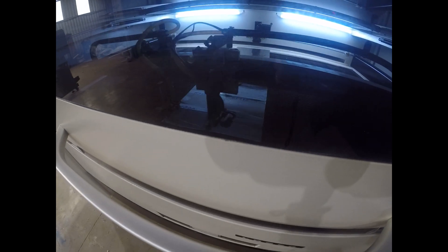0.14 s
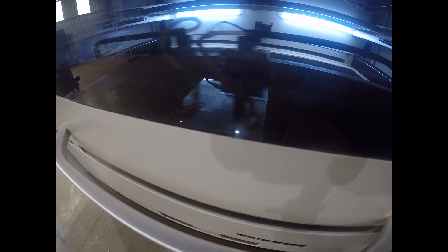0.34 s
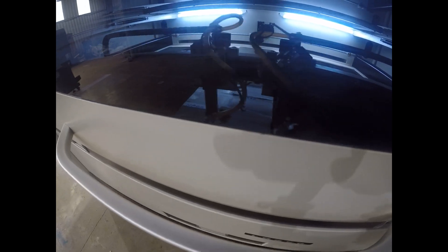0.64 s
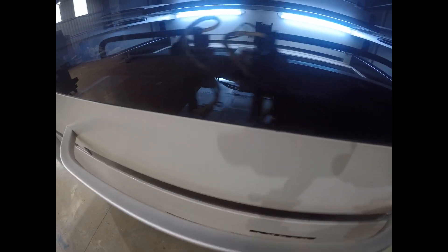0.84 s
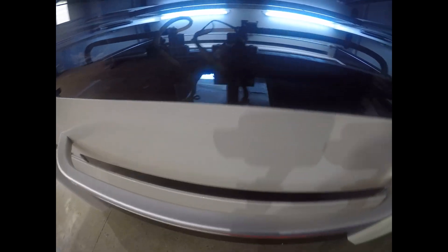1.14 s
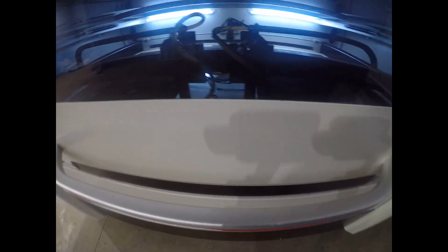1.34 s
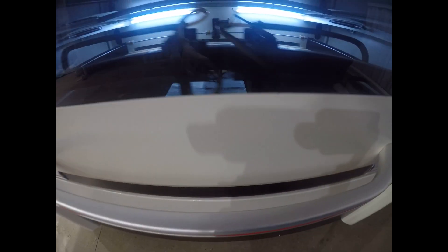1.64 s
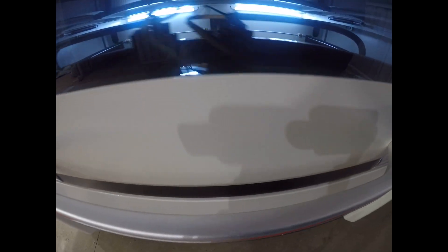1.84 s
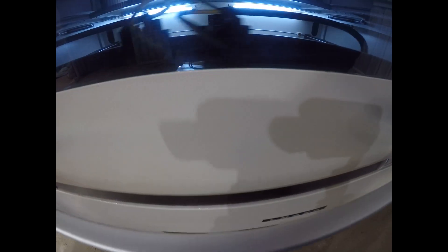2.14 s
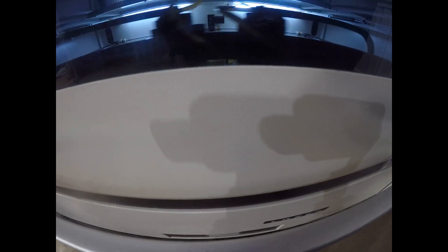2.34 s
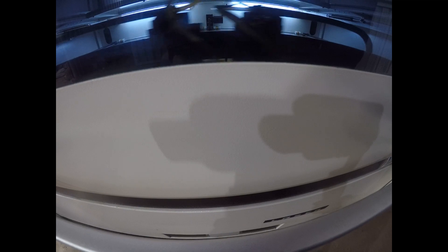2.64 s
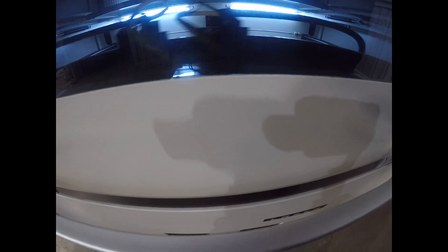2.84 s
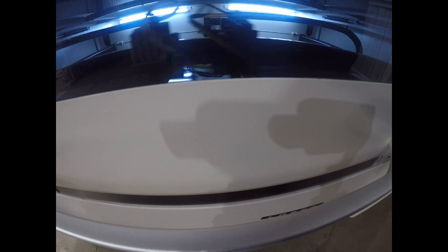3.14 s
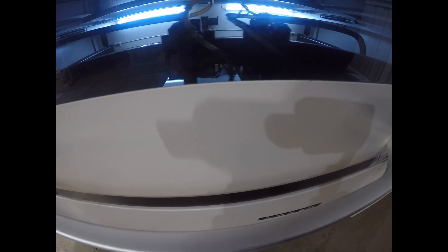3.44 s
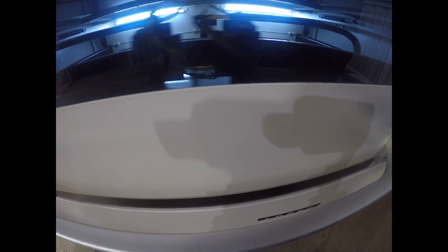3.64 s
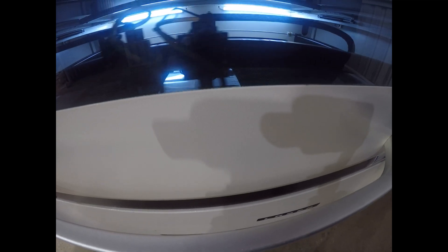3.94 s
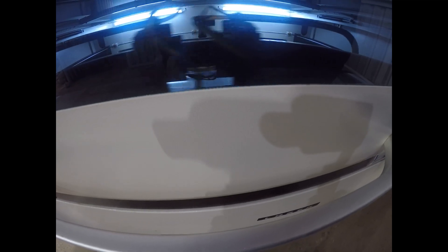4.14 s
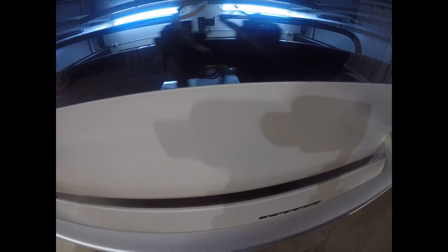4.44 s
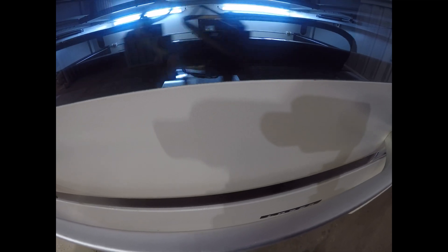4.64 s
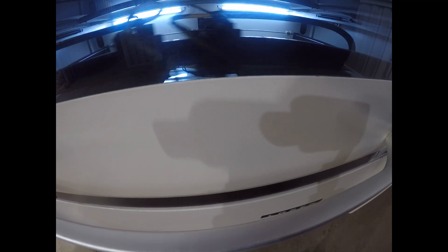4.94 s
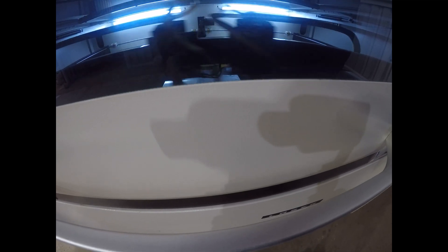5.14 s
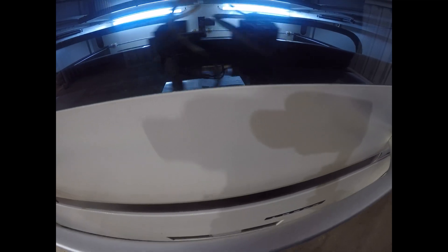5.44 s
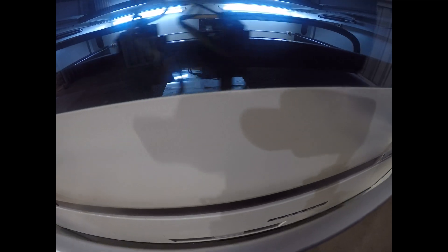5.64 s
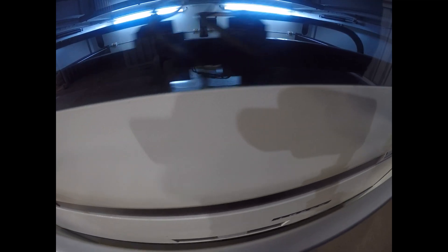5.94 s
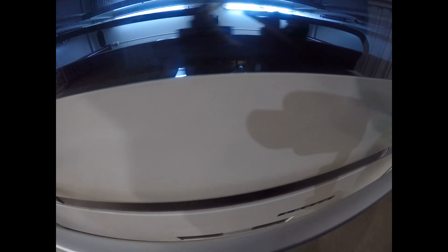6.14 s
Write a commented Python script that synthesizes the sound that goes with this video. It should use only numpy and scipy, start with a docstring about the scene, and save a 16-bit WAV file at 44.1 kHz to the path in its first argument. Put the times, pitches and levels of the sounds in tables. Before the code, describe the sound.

A closed laser engraver runs throughout, about six seconds, heard from just in front of its lid in a workshop. The main sound is a steady low drone from the air pump, mixed with the rumble of the exhaust fan, a fine buzz and a faint hiss of air. Over this, the head carriage swishes softly through the same group of short moves about once a second, with slight chatter and a very faint whine. Light belt ticks come roughly every half second to second, from 0.8 to 5 seconds. At about 1.2 seconds a shoe gives one gritty scuff on the floor, with a little room echo and a faint squeak after it. The motor hum swells briefly around 4.4 seconds, and the hiss around 5.3. Two light, hollow knocks follow at about 5.85 and 6 seconds. The machine grows very slightly louder overall.

```python
"""A closed laser engraver at work in a workshop, heard from just in front of its lid.
Its mains-driven air pump drones and buzzes, the exhaust fan rumbles and air hisses from the nozzle.
The head carriage swishes through the same moves about once a second, with belt ticks and a faint whine.
A shoe scuffs the floor once; two light knocks come near the end."""
import sys
import numpy as np
from scipy import signal
from scipy.fft import rfft, irfft
from scipy.io import wavfile

SR = 44100
rng = np.random.default_rng(int(sys.argv[2]) if len(sys.argv) > 2 else 0)


def inscribe(sig):
    """Save sig as 16-bit PCM at rate SR to the path in sys.argv[1].

    A 1-D sig is mono; a 2-D sig holds one channel per row.
    Samples are clipped to [-1, 1] before scaling.
    """
    pcm = np.round(np.clip(np.atleast_2d(sig).T, -1, 1) * 32767)
    wavfile.write(sys.argv[1], SR, pcm.astype(np.int16))


N = 278182
TIME = np.arange(N) / SR


def undb(db):
    """Decibels to gain."""
    return 10 ** (np.asarray(db) / 20)


def unit(x):
    """Scale to rms 1."""
    return x / np.sqrt(np.mean(x ** 2))


def noise():
    """White noise."""
    return rng.standard_normal(N)


def walk(rate_hz):
    """Smooth random drift, about rate_hz new values a second; rms 1."""
    freq_hz = np.fft.rfftfreq(N, 1 / SR)
    return unit(irfft(rfft(noise()) / (1 + (freq_hz / rate_hz * 2) ** 4), N))


def colour(x, spectrum):
    """Filter by (freq_hz, gain_db) points, steep skirts beyond the ends; rms 1."""
    points_hz, gain_db = np.transpose(spectrum)
    freq_hz = np.fft.rfftfreq(N, 1 / SR) + 1
    gain = undb(np.interp(np.log(freq_hz), np.log(points_hz), gain_db))
    skirts = np.minimum(freq_hz / points_hz[0], 1) ** 4 * np.minimum(points_hz[-1] / freq_hz, 1) ** 4
    return unit(irfft(rfft(x) * gain * skirts, N))


def band(x, centre_hz, width_hz):
    """One resonance; rms 1."""
    return unit(signal.lfilter(*signal.iirpeak(centre_hz, centre_hz / width_hz, fs=SR), x))


def tone(pitch_hz, phase_turns=0):
    """Sine following a pitch curve; rms 1."""
    return np.sqrt(2) * np.sin(2 * np.pi * (np.cumsum(pitch_hz) / SR + phase_turns))


def grains(rate_hz, spread_db):
    """Dense tiny impacts of unequal size; rms 1."""
    impacts = (rng.random(N) < rate_hz / SR) * noise()
    return unit(impacts * undb(spread_db * np.minimum(rng.exponential(size=N), 4)))


def blows(start_s, level_db, t60_s):
    """Envelope of sudden, decaying blows."""
    age_s = TIME - np.asarray(start_s)[:, None]
    return undb(level_db) @ ((age_s >= 0) * np.exp(-np.log(1000) * np.abs(age_s) / t60_s))


def stroke(start_s, length_s, attack_s, t60_s):
    """Envelope of a movement: rise, hold, decay."""
    age_s = TIME - start_s
    decay = np.exp(-np.log(1000) * np.maximum(age_s - length_s, 0) / t60_s)
    return np.clip(age_s / attack_s, 0, 1) * decay


def swell(middle_s, length_s, level_db):
    """Round-topped envelope."""
    return undb(level_db) / (1 + (2 * (TIME - middle_s) / length_s) ** 4)


def room(x, t60_s, wet_db):
    """Add the workshop's diffuse tail."""
    tail = noise() * np.exp(-np.log(1000) * TIME / t60_s) * (1 - np.exp(-TIME / 0.012))
    return x + undb(wet_db) * signal.fftconvolve(x, tail / np.linalg.norm(tail))[:N]


# pump drone: mains_multiple, level_db
PUMP_HARMONICS = [(1, -31), (2, -36.5), (3, -31), (4, -55.5), (5, -60)]
# valve buzz through the casing: freq_hz, gain_db
VALVE_SPECTRUM = [(1200, -11), (2500, -7.5), (3600, 2.5), (4600, -6), (5400, 0.5), (6000, 4.5), (6700, 3),
                  (7400, 2.5)]


def pump(mains_hz, waver_db, buzz_db):
    """Harmonics dip in phase on each suction stroke; two valves tick in turn and ring the casing."""
    turns = mains_hz * TIME + 0.0038 * walk(2.2)
    drone = 0
    for multiple, level_db in PUMP_HARMONICS:
        peak = np.sqrt(2) * undb(level_db + waver_db * walk(1.0))
        drone -= peak * np.cos(2 * np.pi * round(multiple) * turns)
    valves = 0
    # two ticks a cycle favour even harmonics; the casing scatters size and phase
    for multiple in range(20, 125):
        size = rng.uniform(0.4, 1) * (0.6 if multiple % 2 else 1)
        valves += size * np.cos(2 * np.pi * (multiple * mains_hz * TIME + rng.random()))
    return drone + undb(buzz_db) * colour(valves, VALVE_SPECTRUM)


# shaft and blade tones: pitch_hz, level_db, wander_hz
FAN_TONES = [(55.13, -37, 0.2), (75.14, -41, 0.12), (96.7, -45, 0.32), (161.7, -46.5, 0.52),
             (188.9, -44.5, 0.31), (343, -68, 0.47), (419.3, -62.5, 0.504), (442, -74, 0.25),
             (479.2, -69.5, 1.473), (754, -75.5, 3.88), (1000, -72, 0.42), (1623, -75, 0.915),
             (2266, -73.5, 2), (3860, -73, 3.05)]
# motor hum, one swell: time_s, level_db
HUM_LEVELS = [(0, -55.5), (1.05, -54), (1.4, -48.5), (3.95, -48), (4.4, -38), (4.9, -50.5), (6.3, -47)]
# exhaust fan and duct: freq_hz, gain_db
RUMBLE_SPECTRUM = [(8, 4.5), (26, -1), (43, -4.5), (60, 1), (85, 2.5), (110, -4.5), (140, -7.5),
                   (170, -0.5), (200, -8.5), (260, -13), (320, -16.5), (400, -20.5), (490, -30.5),
                   (570, -47.5)]


def fans(hum_hz, flutter_db):
    """Shaft and blade tones wander over turbulent duct rumble; a motor hums beside them."""
    tones = 0
    for pitch_hz, level_db, wander_hz in FAN_TONES:
        gain = undb(level_db + 2.86 * walk(2.5))
        tones += gain * tone(pitch_hz + wander_hz * walk(2.98), phase_turns=rng.random())
    time_s, hum_db = np.transpose(HUM_LEVELS)
    hum = undb(np.interp(TIME, time_s, hum_db)) * tone(hum_hz + 0.31 * walk(2.7))
    rumble = undb(-33 + flutter_db * walk(17)) * colour(noise(), RUMBLE_SPECTRUM)
    return tones + hum + rumble


# cabinet airflow: freq_hz, gain_db
CABINET_SPECTRUM = [(480, -29), (570, -12.5), (660, -1.5), (760, 1.5), (950, -2.5), (1040, -9),
                    (1160, -11.5), (1290, -1.5), (1650, -1), (1880, -5.5), (2300, -5), (3150, -11.5),
                    (3600, -12.5), (5000, -20.5)]
# nozzle hiss: freq_hz, gain_db
NOZZLE_SPECTRUM = [(2500, -5.5), (4500, -5), (6700, -0.5), (8200, -1.5), (9200, -1), (9750, 5),
                   (10300, -7.5), (11400, -7.5), (11700, -15), (12500, -13.5), (13150, -12), (13600, -18),
                   (14300, -15), (15000, -31)]
# broader hiss: freq_hz, gain_db
SURGE_SPECTRUM = [(1400, -4.5), (2050, -14), (2700, -1.5), (3400, -8), (4500, -1), (5500, -0.5),
                  (6900, -0.5), (9000, -5.5), (12000, -19)]
# its swells: middle_s, length_s, level_db
SURGE_SWELLS = [(2.05, 0.4, -57.5), (2.823, 0.3, -54), (5.265, 0.32, -48)]


def air(flutter_db):
    """Air rushes through the cabinet and hisses from the nozzle; a broader hiss swells at times."""
    cabinet = undb(-54.5 + flutter_db * walk(4.7)) * colour(noise(), CABINET_SPECTRUM)
    nozzle = undb(-53 + flutter_db * walk(28)) * colour(noise(), NOZZLE_SPECTRUM)
    surge = sum(swell(*row) for row in SURGE_SWELLS) * colour(noise(), SURGE_SPECTRUM)
    return cabinet + nozzle + surge


# head moves within one cycle: start_s, length_s, level_db
HEAD_MOVES = [(0.252, 0.082, -48), (0.36, 0.067, -50), (0.416, 0.066, -44), (0.717, 0.057, -46),
              (0.77, 0.032, -45), (0.86, 0.018, -49), (0.9, 0.03, -50), (0.954, 0.02, -49.5)]
# belt and bearings: freq_hz, gain_db
BELT_SPECTRUM = [(1400, -14), (2400, -12), (3250, -14), (3580, 0.5), (4400, -11.5), (5300, -3.5), (6600, 0),
                 (7700, 3), (8300, -2.5), (9600, -2.5), (10600, -14), (14000, -26)]
# loose parts: centre_hz, width_hz, gain_db
CHATTER_BANDS = [(3565, 130, -22), (3980, 250, -23.5), (6730, 350, -11.5), (7380, 350, -15),
                 (7780, 350, -19)]


def carriage(cycle_s, swish_db, uneven_db, chatter_db):
    """Belt and bearings swish on each move; every loose part chatters in fits of its own."""
    power = sum((undb(level_db) * stroke(cycle_start_s + start_s, length_s, attack_s=0.01, t60_s=0.34)) ** 2
                for cycle_start_s in np.arange(-cycle_s, TIME[-1], cycle_s)
                for start_s, length_s, level_db in HEAD_MOVES)
    travel = np.sqrt(power) * undb(uneven_db * walk(47))
    swish = undb(swish_db) * colour(grains(rate_hz=7000, spread_db=-0.5), BELT_SPECTRUM)
    chatter = 0
    for centre_hz, width_hz, gain_db in CHATTER_BANDS:
        fits = undb(chatter_db * walk(29))
        chatter += undb(gain_db) * unit(fits * band(noise(), centre_hz, width_hz))
    return travel * (swish + chatter)


# belt ticks: start_s, click_db, ring_db
BELT_TICKS = [(0.797, -54, -51), (0.967, -46, -51), (1.197, -51, -52), (1.712, -44.5, -49.5),
              (2.248, -44, -65), (3.068, -46, -50), (3.588, -45, -53), (4.104, -45, -54), (4.606, -45, -55),
              (5.042, -45, -60)]


def belt_ticks(ring_hz):
    """The belt ticks: a sharp click and a narrow ring."""
    start_s, click_db, ring_db = np.transpose(BELT_TICKS)
    click = blows(start_s, click_db, t60_s=0.054) * colour(noise(), BELT_SPECTRUM)
    ring = blows(start_s, ring_db, t60_s=0.11) * band(noise(), ring_hz, width_hz=90)
    return click + ring


# drive whine: middle_s, length_s, level_db
WHINE_SWELLS = [(0.92, 0.093, -66), (1.81, 0.32, -64.5), (3.7, 0.21, -70)]


def drive_whine(pitch_hz, idle_db):
    """The drive motor whines faintly, louder on some moves."""
    effort = undb(idle_db) + sum(swell(*row) for row in WHINE_SWELLS)
    return effort * tone(pitch_hz + 3 * walk(18.7))


# grit under the sole: freq_hz, gain_db
GRIT_SPECTRUM = [(1200, -6.5), (2300, -8), (2900, 0), (3800, -1), (5000, -3), (6900, -3), (8500, -11),
                 (10500, -23), (14500, -37)]
# sole edge: freq_hz, gain_db
RASP_SPECTRUM = [(900, 0), (1150, -15), (1450, 5.5), (1900, -0.5), (2300, 9), (2900, -21)]
# hollow thud of sole and knocks: freq_hz, gain_db
THUD_SPECTRUM = [(220, 11), (400, -6), (560, -11.5), (780, 1), (950, -5), (1200, -34), (2500, -30)]


def scuff(start_s, sole_lag_s, squeak_s):
    """A sole's edge rasps, drags over grit and settles with a duller rub; a faint squeak follows."""
    drag = undb(-35.5) * stroke(start_s, length_s=0.084, attack_s=0.012, t60_s=0.17)
    grit = drag * colour(grains(rate_hz=16000, spread_db=1), GRIT_SPECTRUM)
    edge = undb(-40) * stroke(start_s, length_s=0.045, attack_s=0.0044, t60_s=0.25)
    rasp = edge * colour(grains(rate_hz=4400, spread_db=4.5), RASP_SPECTRUM)
    landing = undb(-38) * stroke(start_s + sole_lag_s, length_s=0.022, attack_s=0.014, t60_s=0.05)
    rub = landing * colour(noise(), THUD_SPECTRUM)
    narrow_noise = band(band(noise(), 1620, 170), 1620, 170)
    squeak = swell(squeak_s, length_s=0.12, level_db=-57.5) * narrow_noise
    return room(grit + rasp + rub, t60_s=1.15, wet_db=-7.5) + squeak


# contacts, the first three heard as one knock: start_s, click_db, thud_db
KNOCK_CONTACTS = [(5.849, -48, -37.5), (5.855, -42.5, -44), (5.869, -40.5, -45), (5.998, -39, -51)]
# contact click: freq_hz, gain_db
CLICK_SPECTRUM = [(1200, -14), (3000, -8), (3900, -1.5), (5200, -5), (6600, -1), (8500, -10), (14000, -34)]


def knocks():
    """Light contacts: a short click over a longer hollow thud."""
    start_s, click_db, thud_db = np.transpose(KNOCK_CONTACTS)
    click = blows(start_s, click_db, t60_s=0.053) * colour(noise(), CLICK_SPECTRUM)
    thud = blows(start_s, thud_db, t60_s=0.1) * colour(noise(), THUD_SPECTRUM)
    return room(click + thud, t60_s=0.6, wet_db=-13)


def scene():
    """The engraver, a scuff and knocks; drone and head grow slightly louder as the listener nears."""
    approach_db_per_s = 0.16
    nearness = undb(approach_db_per_s * (TIME - TIME.mean()))
    drone = pump(mains_hz=60.02, waver_db=0.55, buzz_db=-58.5) + fans(hum_hz=238.1, flutter_db=1)
    head = carriage(cycle_s=0.936, swish_db=-5, uneven_db=1.64, chatter_db=3.8)
    head += belt_ticks(ring_hz=3540) + drive_whine(pitch_hz=1916, idle_db=-74.5)
    hiss = air(flutter_db=0.56)
    shoe = scuff(start_s=1.238, sole_lag_s=0.073, squeak_s=1.52)
    return (nearness * (drone + head) + hiss + shoe + knocks())[None]


def record(dry):
    """Fade both ends and cut the top treble."""
    fade_s, cutoff_hz = 0.003, 15050
    fade = np.clip(np.minimum(TIME, TIME[-1] - TIME) / fade_s, 0, 1)
    return signal.sosfilt(signal.ellip(10, 0.1, 80, cutoff_hz, fs=SR, output="sos"), dry * fade)


dry = scene()
out = record(dry)
inscribe(out)
```